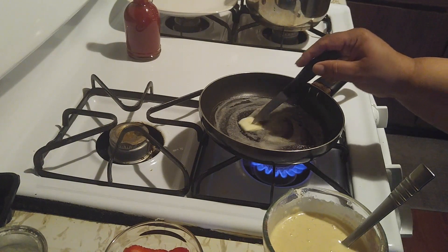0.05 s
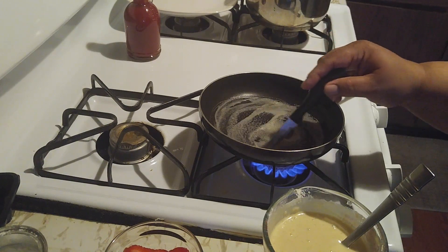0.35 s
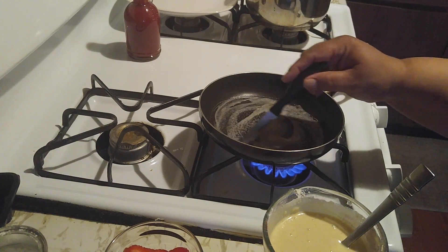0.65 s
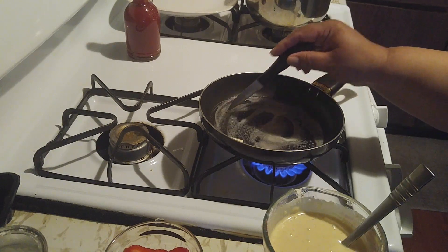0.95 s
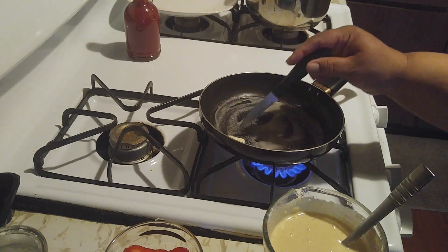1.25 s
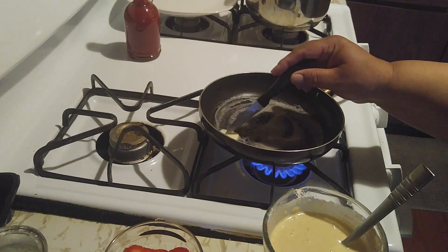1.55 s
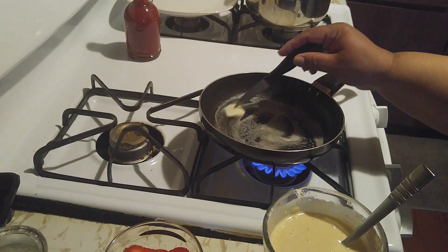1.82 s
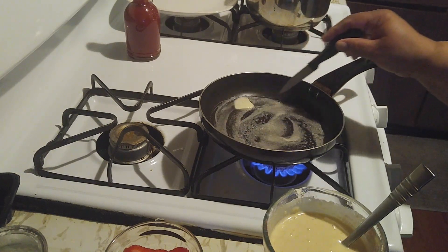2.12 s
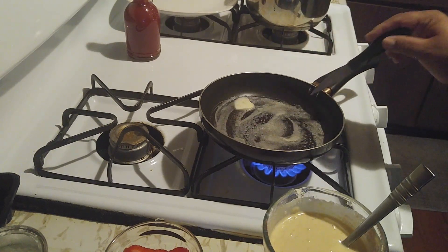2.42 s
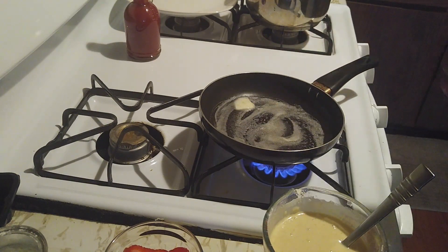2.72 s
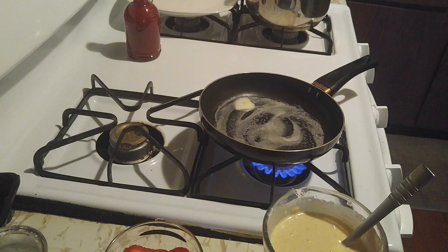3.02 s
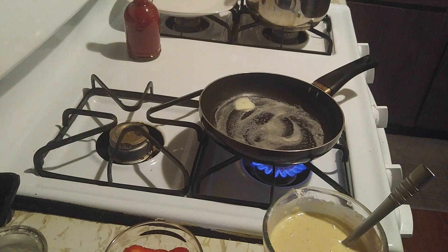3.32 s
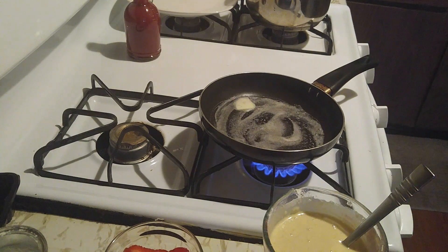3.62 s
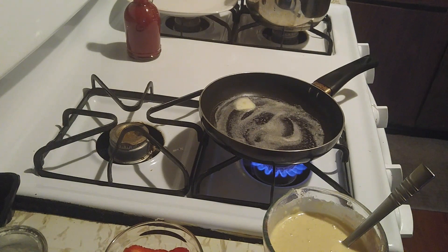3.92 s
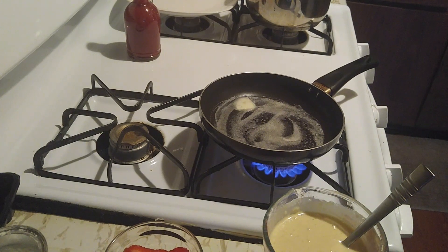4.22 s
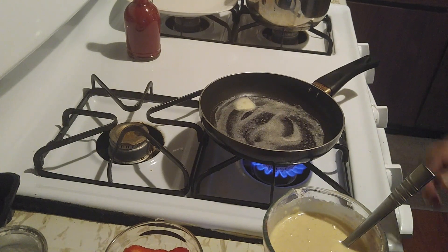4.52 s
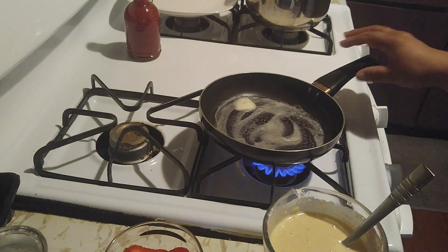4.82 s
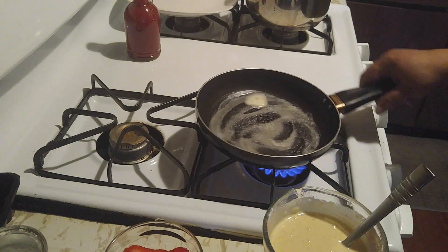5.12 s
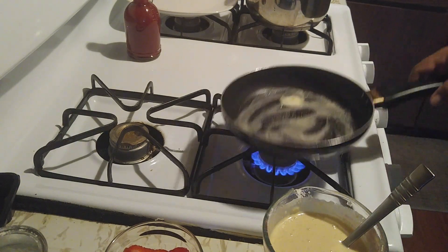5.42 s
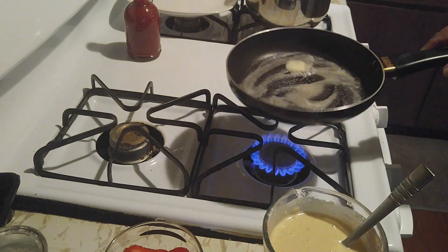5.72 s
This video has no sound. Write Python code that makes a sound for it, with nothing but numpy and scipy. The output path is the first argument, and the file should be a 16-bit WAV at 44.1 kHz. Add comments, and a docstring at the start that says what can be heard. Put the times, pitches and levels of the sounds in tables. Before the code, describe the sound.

Butter sizzles over a humming gas burner as a spatula stirs, clatters onto the worktop, and the pan scrapes across the stove grate.

```python
"""A gas burner hums and rumbles under butter sizzling in a pan, heard close up by a stereo microphone
pair in a small kitchen. Bubbles burst and spit, flaring as a plastic spatula taps and rubs round the pan.
The spatula is put down beside the stove, where it slides and bounces, ringing the worktop.
Last, the pan grinds, squeals and knocks on the iron grate and is lifted while the fat hisses."""
import sys
import numpy as np
from scipy import signal
from scipy.fft import rfft, irfft
from scipy.io import wavfile

SR = 44100
rng = np.random.default_rng(int(sys.argv[2]) if len(sys.argv) > 2 else 0)


def dump_mix(stems):
    """Bounce the given channels to the path in sys.argv[1] as a 16-bit WAV at rate SR."""
    frames = np.atleast_2d(stems).T  # one column per channel
    limited = np.clip(frames, -1, 1)  # hard clip at full scale
    pcm = np.round(limited * 32767).astype(np.int16)
    wavfile.write(sys.argv[1], SR, pcm)


N = 254016
TIME = np.arange(N) / SR


def from_db(db):
    return 10 ** (np.asarray(db) / 20)


def rms_one(x):
    return x / np.sqrt(np.mean(x ** 2) + 1e-20)


def at_hz(points, hz):
    """Read a curve on a log-frequency axis."""
    known_hz, values = np.transpose(points)
    return np.interp(np.log(hz + 1e-3), np.log(known_hz), values)


def drift(rate_hz):
    """A smooth random wander, rms about 1."""
    step, settle = 40, 2000
    r = np.exp(-2 * np.pi * step * rate_hz / SR)
    slow = signal.lfilter([1], [1, -2 * r, r * r], rng.standard_normal(N // step + settle + 2))[settle:]
    return np.interp(np.arange(N) / step, np.arange(len(slow)), rms_one(slow))


# How alike the two microphones hear a noise. Each row: frequency in Hz, correlation.
LIKENESS = [(100, .99), (300, 0.93), (700, 0.68), (1400, 0.41), (3000, 0.74), (5000, 0.67), (7500, 0.012),
            (12000, 0.71)]

def noise(spectrum=None, size=N):
    """Stereo noise of a given colour, nearly mono in the bass; rms 1."""
    hz = np.arange(size // 2 + 1) * SR / size
    mid, side = rfft(rng.standard_normal((2, size)))
    alike = at_hz(LIKENESS, hz)
    both = np.sqrt(1 + alike) * mid + np.sqrt(1 - alike) * side * [[1], [-1]]
    return rms_one(irfft(both * from_db(at_hz(spectrum, hz) if spectrum else 0), size))


def filtered(x, edge_hz, kind, order=2):
    """A low- or high-pass."""
    return signal.sosfilt(signal.butter(order, min(edge_hz, .45 * SR), kind, fs=SR, output="sos"), x)


def dying(t, t60):
    """Falls 60 dB in t60 seconds."""
    return np.exp(-np.log(1000) * t / t60)


def add(out, s, sound):
    """Mix a sound in at time s."""
    start = round(s * SR)
    out[:, start:start + sound.shape[-1]] += sound[:, :N - start]


def lean(x, left_db):
    """Make a sound louder at the left microphone than at the right."""
    return x * from_db(left_db * np.array([[.5], [-.5]]))


def swelling(x, swell_db, per_s):
    """Split a sound into bands, narrow in the treble, that each swell and fade by themselves."""
    spectrum, hz = rfft(x), np.arange(N // 2 + 1) * SR / N
    band = np.digitize(hz, np.geomspace(2000, 13000, 7))
    return sum(irfft(spectrum * (band == k), N) * from_db(swell_db * drift(per_s)) for k in range(8))


def stroke(s, length_s, first_db, last_db, release_s, attack_s=0.0026):
    """Envelope of a rub: a quick bite, a steady change of pressure, a fall of 60 dB per release time."""
    t = TIME - s
    held = from_db(np.interp(t, [0, length_s], [first_db, last_db]))
    release = dying(np.clip(t - length_s, 0, 2 * release_s), release_s)
    return np.clip(t / attack_s, 0, 1) * held * release


def strokes(rows):
    """The envelope of all rubs in a table."""
    return sum(stroke(*row[:5]) for row in rows)


def friction(resonances, rough_db=0, slips_per_s=150):
    """Slips, uneven by rough_db, excite a body's resonances; the sound falls away outside them; rms 1."""
    slips = noise() * from_db(rough_db * drift(slips_per_s))
    out = 0
    for k, (hz, width_hz, db) in enumerate(resonances):
        r = np.exp(-np.pi * width_hz / SR)
        feedback = [1, -2 * r * np.cos(2 * np.pi * hz / SR), r * r]
        out = out + (-1) ** k * from_db(db) * signal.lfilter([1 - r * r, 0, r * r - 1], feedback, slips)
    out = filtered(out, 0.79 * resonances[0][0], "high", order=6)
    return rms_one(filtered(out, 0.85 * resonances[-1][0], "low", order=3))


# The crack of a hard contact, close up. Each row: frequency in Hz, relative density in dB.
CRACK_COLOUR = [(40, -40), (200, -25), (500, -5), (740, 8), (1100, 0.5), (1500, 3.5), (2400, 0.5),
                (3400, 4.5), (4900, 0.5), (5800, -7), (8000, -5.5), (9300, -22), (12000, -11), (16000, -13)]

def blows(hits, modes, crack_t60, build_s, vary_db, phase_spread):
    """Each contact gives a snap, a crack of dense short modes and the body's ring; soft ones are duller."""
    out, t = np.zeros((2, N)), TIME[:SR // 5]
    hz, mode_db, t60 = np.transpose(modes)[:, :, None]
    rings = np.exp(2j * np.pi * hz * t) * dying(t, t60) * (1 - np.exp(-t / build_s))
    signs = (-1) ** np.arange(len(hz))[:, None]   # neighbouring modes swing opposite ways
    for s, db, contact_hz, thump_db, crack_db in hits:
        strength = signs * from_db(mode_db + thump_db * (hz < 500) + vary_db * rng.standard_normal(hz.shape))
        # short waves reach the two microphones out of step
        phase = phase_spread * np.minimum(hz / 1000, 1) * rng.standard_normal((len(hz), 2))
        ring = ((strength * np.exp(1j * phase)).T @ rings).imag
        snap = from_db(4.5) * noise(SIZZLE_COLOUR, size=len(t)) * dying(t, t60=0.018)
        crack = noise(CRACK_COLOUR, size=len(t)) * dying(t, crack_t60)
        crack = from_db(crack_db) * filtered(crack, contact_hz, "low", order=1)
        add(out, s, from_db(db) * (filtered(ring + snap, contact_hz, "low") + crack))
    return out


# Flame and gas, just left of centre. Each row: frequency in Hz, relative density in dB.
FLAME_RUMBLE = [(20, -36), (38, -42), (48, -3), (90, -3), (106, -5), (165, -3), (200, -4), (250, -12),
                (310, -10.5), (480, -22), (600, -46)]
FLAME_ROAR = [(480, -72), (530, -15.5), (610, -3), (730, -0.5), (850, -2.5), (1000, -9), (1350, -16.5),
              (1650, -23.5), (2200, -42), (4000, -56.5)]
GAS_HISS = [(1060, -8), (1800, 4), (2370, 0.5), (2570, -2.5), (2870, -0.5), (3480, -2), (3990, 2),
            (6070, -10.5), (6650, -5), (8910, -10), (9860, -6.5), (13000, -8), (15100, -10), (16000, -13)]
# The slow rise and fall of the hiss. Each row: time in seconds, gain in dB.
HISS_SWELL = [(0, -2.5), (2.15, -2.5), (2.55, 1), (2.8, -2.5), (4.05, -1.5), (4.45, -1), (4.8, 0.5),
              (5.76, 0)]
# The hum at the stove. Each row: frequency in Hz, rms level in dB, pitch wander in Hz.
HUM_TONES = [(60.1, -56.5, 0.49), (117.9, -56, 1.33), (159.2, -53.5, 3.994), (363, -67, 0.63),
             (724, -61.5, 1.33)]

def burner():
    """The flame rumbles and roars, gas hisses through the ports, and a wavering hum lies beneath."""
    rumble = from_db(-48.5) * noise(FLAME_RUMBLE)
    uncovered_db = np.interp(TIME, [4.7, 4.81], [0, 3.5])   # louder once the pan moves off the flame
    roar = from_db(-52 + uncovered_db) * noise(FLAME_ROAR)
    hiss_db = -59.5 + np.interp(TIME, *np.transpose(HISS_SWELL))
    hiss = from_db(hiss_db) * swelling(noise(GAS_HISS), swell_db=1.95, per_s=11)
    hum = 0
    for hz, db, wander_hz in HUM_TONES:
        turns = np.cumsum(hz + wander_hz * drift(3.013)) / SR
        hum = hum + from_db(db) * rms_one(np.sin(2 * np.pi * turns) * from_db(2.15 * drift(5.7)))
    return lean(rumble + hum, left_db=0.67) + lean(roar, left_db=2.5) + lean(hiss, left_db=0.8)


# Hot fat, dead centre between the microphones. Each row: frequency in Hz, relative density in dB.
SIZZLE_COLOUR = [(2000, -2), (4500, -15.5), (7000, -1.5), (9000, -4.5), (12000, 1.5), (15000, -2),
                 (17000, -7)]
# Its loudest spits. Each row: start in seconds, peak level in dB.
LOUD_SPITS = [(0.071, -29.5), (0.2788, -35), (0.3012, -36), (0.4707, -39), (0.5255, -33.5), (0.838, -41),
              (0.879, -40), (1.0926, -36.5), (1.6711, -37.5), (2.7691, -42.5), (3.687, -36)]

def butter_frying(flare_lag_s=0.033, fade_db_per_s=3.5, small_spits_per_s=6, small_spit_db=-47):
    """Tiny bubbles burst in a sizzle that flares when the fat is moved; now and then a larger one spits."""
    resting = from_db(-68 - fade_db_per_s * TIME)
    stirred = from_db(-14) * np.interp(TIME - flare_lag_s, TIME, strokes(STIRS))
    shaken = from_db(-20.5) * strokes(DRAGS) + from_db(-5) * strokes(TILTS)
    out = (resting + stirred + shaken) * rms_one(noise(SIZZLE_COLOUR) * from_db(3.3 * drift(180)))
    small_spits = [(s, small_spit_db) for s in TIME[rng.random(N) < small_spits_per_s / SR]]
    t = TIME[:SR // 10]
    middling_db = np.median([db for _, db in LOUD_SPITS])
    for s, db in list(LOUD_SPITS) + small_spits:
        t60 = 0.017 * 2 ** ((db - middling_db) / 17.5)   # louder spits last longer
        spit = noise(SIZZLE_COLOUR, size=len(t)) * dying(t, t60)
        add(out, s, from_db(db) * spit / np.abs(spit).max())
    return out


# The spatula in the pan, close in front. Each row: start and length in seconds,
# first and last level in dB, release in seconds, tap level in dB.
STIRS = [(.052, .15, -44.5, -45, 0.53, -41.5), (.446, 0.097, -52.5, -56, 0.15, -40.5),
         (.8, 0.023, -66, -60, 0.13, -59), (1.361, 0.27, -61, -51.5, 0.17, -40.5)]
# Resonances of the pan and of its floor. Each row: frequency and width in Hz, relative level in dB.
PAN_MODES = [(1630, 123, 3), (2000, 240, -7.5), (2510, 165, -4.5), (2970, 104, -4.5), (3630, 680, -11.5),
             (4900, 220, -11.5)]
PAN_FLOOR_MODES = [(1284, 75, -6), (1444, 57, -4)]

def spatula_stirring(groan_onset_db=-45.5, tap_cutoff_hz=3440, tap_t60=0.042):
    """Each stroke lands with a soft tap and rubs the pan; hard rubbing sets the pan floor groaning."""
    rub = strokes(STIRS)
    groan = rub * np.minimum(rub / from_db(groan_onset_db), 1.2) ** 2
    rubbing = rub * friction(PAN_MODES, rough_db=0.5, slips_per_s=26)
    groaning = groan * friction(PAN_FLOOR_MODES, rough_db=3, slips_per_s=93)
    taps = [(s, db, tap_cutoff_hz, 0, -0.5) for s, *_, db in STIRS]
    modes = [(hz, db, tap_t60) for hz, _, db in PAN_MODES]
    tapping = blows(taps, modes, crack_t60=0.011, build_s=0.0021, vary_db=2, phase_spread=0.5)
    return lean(rubbing + groaning + tapping, left_db=0.3)


# A faint rustle, then the spatula on the worktop beside the stove. Each row: start and length in seconds, #
# first and last level in dB, release in seconds.
SLIDES = [(3.04, 0.18, -60.5, -58.5, 0.064), (3.214, 0.14, -51, -44.5, 0.38)]
# Its scrape. Each row: frequency in Hz, relative density in dB.
SLIDE_COLOUR = [(500, -14), (760, 16.5), (1100, -6), (4300, -4.5), (5300, -12), (7000, -7), (12500, -7.5),
                (16000, -15)]

def spatula_sliding():
    """A faint rustle leads in; then plastic scrapes unevenly over the worktop."""
    return lean(strokes(SLIDES) * noise(SLIDE_COLOUR) * from_db(3.5 * drift(110)), left_db=0.3)


# Landings, a little towards the left microphone. Each row: start in seconds, blade level in dB, blade
# cut-off in Hz, relative thump and crack in dB, handle lag in seconds, handle level in dB.
LANDINGS = [(3.2148, -36.5, 12400, -13, -6.5, .0057, -26), (3.256, -52, 5000, -28, 3, .003, -28.5),
            (3.279, -39.5, 7000, -11, -4, .004, -29.5), (3.4326, -21, 7900, 1, 10.5, .003, -19),
            (3.503, -19.5, 6850, -9, 4, .0045, -19), (3.566, -23, 2200, -19.5, -0.5, .0075, -18.5),
            (3.5935, -22, 2830, -10, 3, .004, -28)]
# Worktop and spatula ringing. Each row: frequency in Hz, relative level in dB, t60 in seconds.
WORKTOP_MODES = [(159, -5.5, 0.066), (234, -6.5, 0.11), (426, -14, 0.038), (736, -0.5, 0.054),
                 (778, 1.5, 0.058), (825, -7.5, 0.035), (904, -5, 0.053), (990, -10, 0.04),
                 (1190, -9.5, 0.032), (1304, -5, 0.031), (1415, -10, 0.031), (1520, -3.5, 0.03),
                 (1954, -28, 0.033), (2260, -11, 0.036), (3210, -17, .045), (3634, -7, 0.03)]

def spatula_bouncing(chatter_lag_s=0.016):
    """Each landing is three contacts: the hard blade, the softer handle, and the blade chattering."""
    hits = []
    for s, blade_db, blade_hz, thump_db, crack_db, lag_s, handle_db in LANDINGS:
        handle_hz = 2080 * 2 ** ((handle_db + 19) / 4.5)   # a harder landing is brighter
        hits += [(s, blade_db, blade_hz, thump_db, crack_db),
                 (s + lag_s, handle_db, handle_hz, thump_db, crack_db - 8),
                 (s + chatter_lag_s, blade_db - 10.5, blade_hz, thump_db, crack_db)]
    bouncing = blows(hits, WORKTOP_MODES, crack_t60=0.045, build_s=0.001, vary_db=5.9, phase_spread=0.81)
    return lean(bouncing, left_db=1.5)


# The pan pulled over the grate, close in front. Each row: start and length in seconds,
# first and last level in dB, release in seconds, final squeal level in dB.
DRAGS = [(4.879, 0.073, -58, -45, 0.11, -71), (4.98, 0.058, -35.5, -33.5, 0.43, -45),
         (5.147, 0.066, -37.5, -35, 0.13, -31)]
# Resonances of pan on iron. Each row: frequency and width in Hz, relative level in dB.
GRIND_MODES = [(602, 76, 0), (735, 40, -3.5), (855, 120, -0.5), (1170, 230, -0.5), (1730, 270, -9),
               (2620, 290, -20), (2800, 100, -10), (4280, 4800, -17.5)]
SQUEAL_MODES = [(1206, 40, -1), (1480, 8.3, 3)]

def pan_dragging(squeal_build_db=17):
    """The pan grinds on the grate, and a squeal builds along each drag."""
    grinding = strokes(DRAGS) * friction(GRIND_MODES, rough_db=1.5, slips_per_s=97)
    squeal = sum(stroke(s, length_s, db - squeal_build_db, db, release_s)
                 for s, length_s, _, _, release_s, db in DRAGS)
    return grinding + squeal * friction(SQUEAL_MODES)


# Knocks at the stove top. Each row: start in seconds, level in dB, contact cut-off in Hz,
# relative thump and crack in dB.
KNOCKS = [(4.983, -31, 2600, -18, -1), (4.987, -28.5, 1900, -17, -1.5), (5.027, -37, 1200, 2, -12),
          (5.1, -37.5, 1100, 1, -5), (5.145, -35, 2400, -6.5, 2.5), (5.412, -46, 2700, 0, 2.5),
          (5.472, -51, 2480, -7, 5)]
# Pan and grate ringing. Each row: frequency in Hz, relative level in dB, t60 in seconds.
GRATE_MODES = [(143, 3.5, 0.23), (227, -15, 0.21), (640, -2.5, 0.13), (768, 1.5, 0.09), (846, -6, 0.088),
               (990, -7.5, 0.17), (1188, -7, 0.066), (1533, 2.5, 0.033), (2340, -6, 0.049), (3800, -19, .1)]

def pan_knocking():
    """The pan strikes the iron grate and both ring."""
    return blows(KNOCKS, GRATE_MODES, crack_t60=0.062, build_s=0.00054, vary_db=2.5, phase_spread=0.53)


# The pan leaving the stove. Each row: start and length in seconds, first and last level in dB,
# release in seconds.
LIFTS = [(5.0, 0.51, -52, -45, 0.33)]
# Its low resonances. Each row: frequency and width in Hz, relative level in dB.
SHUFFLE_MODES = [(228.7, 16.6, 4), (314, 35, -6.5), (437, 35, -0.5)]

def pan_lifting():
    """The pan rubs with a low shuffle as it comes off the grate."""
    return strokes(LIFTS) * friction(SHUFFLE_MODES, rough_db=1, slips_per_s=30)


# The pan tilting, still close. Each row: start and length in seconds, first and last level in dB,
# release in seconds.
TILTS = [(5.653, 0.078, -45.5, -45.5, 0.39)]
# Its high resonances. Each row: frequency and width in Hz, relative level in dB.
RASP_MODES = [(2400, 1000, -1.5), (2940, 220, 0), (3460, 530, -23), (4540, 230, 3.5), (4920, 170, -3),
              (9300, 1400, -7)]

def pan_tilting():
    """Even friction gives a thin rasp as the pan tilts."""
    return strokes(TILTS) * friction(RASP_MODES)


def kitchen(x, room_db=-9.5):
    """Near walls answer within milliseconds; a longer, slightly duller tail follows."""
    t = TIME[:SR // 2]
    early = noise(size=len(t)) * dying(t, t60=0.22)
    tail = from_db(2) * filtered(noise(size=len(t)), 14700, "low") * dying(t, t60=0.39)
    walls = filtered((early + tail) * (t > .004), 280, "high")
    walls = walls / np.sqrt(np.sum(walls ** 2) / 2)
    return from_db(room_db) * signal.fftconvolve(x.mean(axis=0)[None], walls, axes=1)[:, :N]


def scene():
    """From beside the stove: fat, spatula and pan sound in the room over the steady burner."""
    spatula = spatula_stirring() + spatula_sliding() + spatula_bouncing()
    frying_pan = lean(pan_dragging() + pan_knocking() + pan_lifting() + pan_tilting(), left_db=0.4)
    near = butter_frying() + spatula + frying_pan
    return burner() + near + kitchen(near)


def record(dry, cutoff_hz=16000):
    """The microphone signal is cut steeply at the top."""
    return signal.sosfilt(signal.ellip(10, .1, 80, cutoff_hz, fs=SR, output="sos"), dry)


dry = scene()
out = record(dry)
dump_mix(out)
```